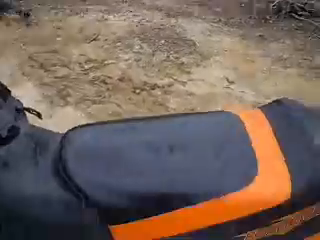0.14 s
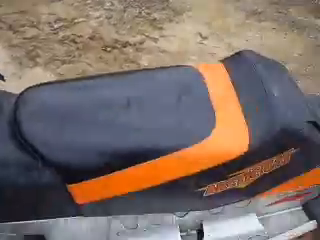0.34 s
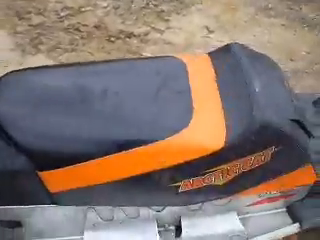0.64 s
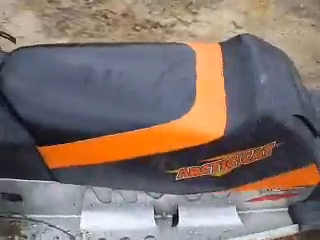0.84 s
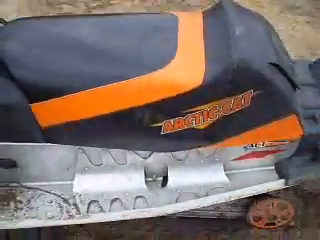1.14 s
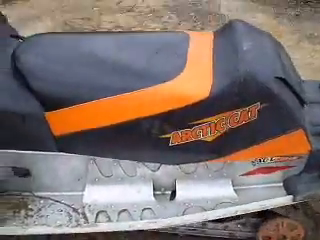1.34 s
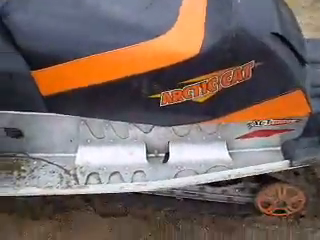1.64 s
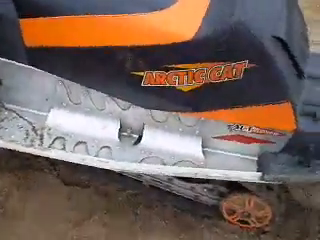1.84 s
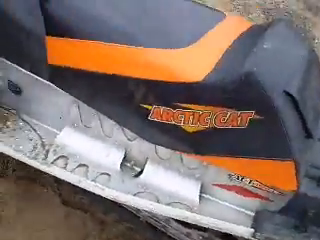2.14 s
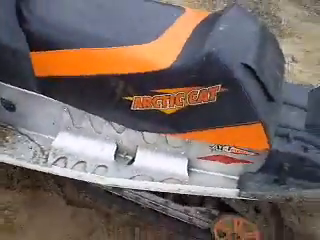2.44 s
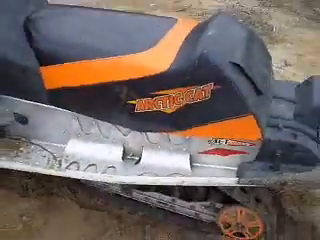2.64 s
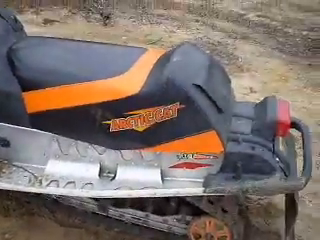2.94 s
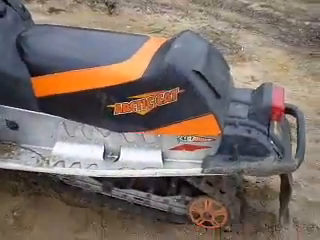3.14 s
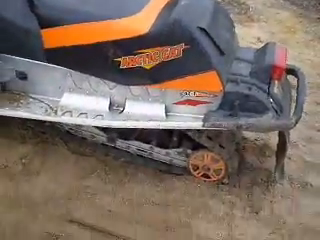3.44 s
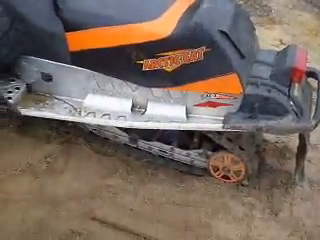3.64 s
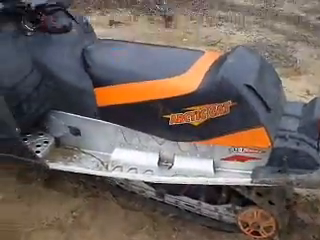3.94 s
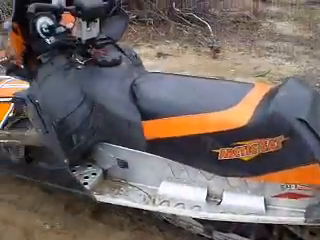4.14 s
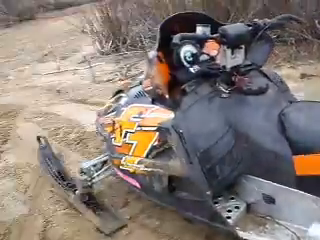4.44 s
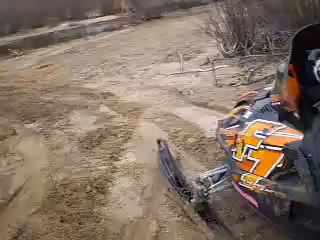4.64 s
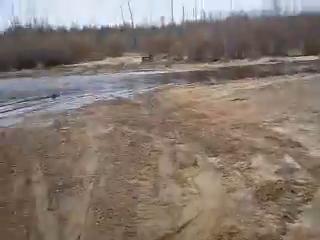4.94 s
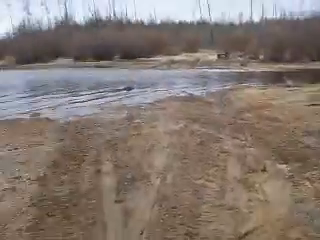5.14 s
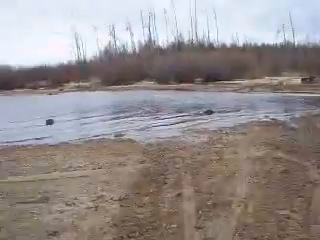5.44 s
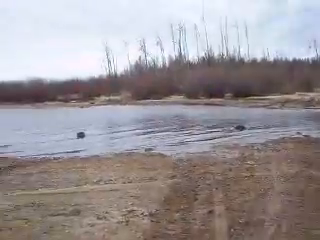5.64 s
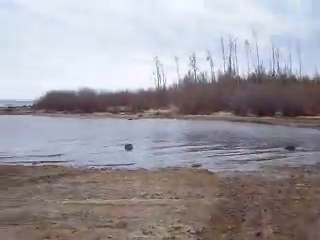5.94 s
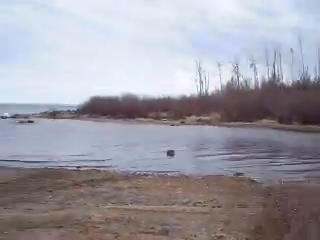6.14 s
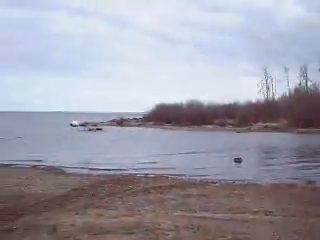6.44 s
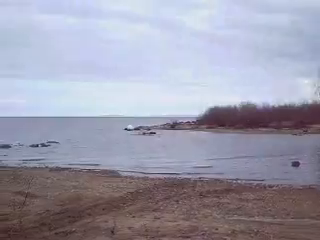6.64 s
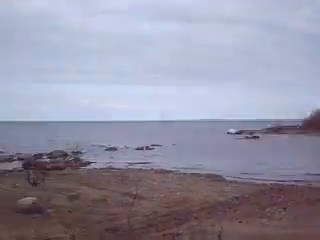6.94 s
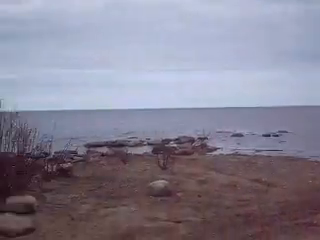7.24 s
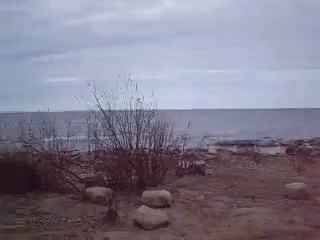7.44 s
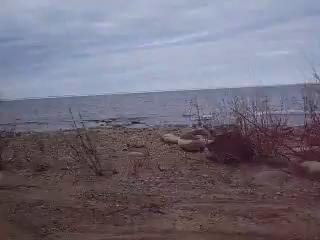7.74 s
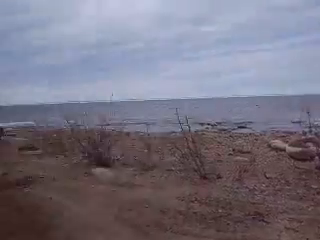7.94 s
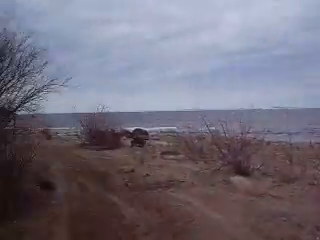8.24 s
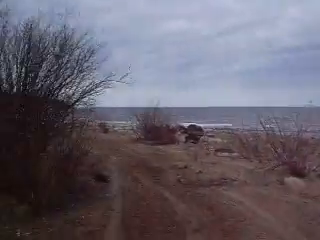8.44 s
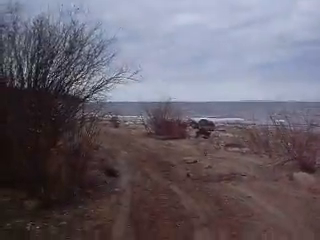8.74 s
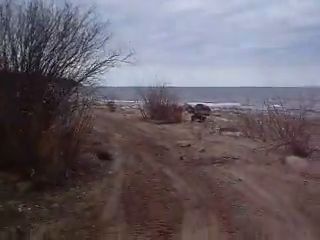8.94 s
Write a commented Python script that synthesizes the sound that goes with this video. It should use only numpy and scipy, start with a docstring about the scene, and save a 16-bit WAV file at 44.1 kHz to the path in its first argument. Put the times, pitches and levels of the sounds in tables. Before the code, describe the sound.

A two-stroke snowmobile is revved in eight short blips, stuttering and popping between them, then idles as wind buffets the microphone.

```python
"""A parked two-stroke snowmobile stutters and bangs as unburnt charge lights late and rings the pipe;
the drive whirrs, the engine clatters, wind gusts. From 0.3 s it is blipped eight times: on the throttle
every stroke fires and the pipe sings. From 1 s come scattered clanks, exhaust cracks and rattles.
After 6.2 s it idles, sagging from 7 s, as the listener walks away along a lake shore. Throughout,
a small camera overloads on the peaks and holds its samples coarsely, which adds a glassy fizz."""
import sys
import numpy as np
from scipy import signal
from scipy.fft import rfft, irfft, next_fast_len
from scipy.io import wavfile
from scipy.ndimage import uniform_filter1d

SR = 44100
rng = np.random.default_rng(int(sys.argv[2]) if len(sys.argv) > 2 else 0)


def transcribe(signal):
    """Save signal, clipped to [-1, 1], as a 16-bit WAV file at the path in sys.argv[1]."""
    frames = np.atleast_2d(signal).T
    limited = np.clip(frames, -1, 1)
    pcm = np.round(limited * 32767).astype(np.int16)
    wavfile.write(sys.argv[1], SR, pcm)


N = 399987
TIME = np.arange(N) / SR


def from_db(db):
    return 10 ** (np.asarray(db) / 20)


def rms_one(x):
    return x / np.sqrt(np.mean(x ** 2) + 1e-20)


def during(start, end):
    return (TIME >= start) & (TIME < end)


def curves(rows):
    """Columns of (t/s, ...) rows, interpolated per sample."""
    times, *columns = np.transpose(rows)
    return [np.interp(TIME, times, column) for column in columns]


def gain_at(spectrum, hz):
    """Gain of (f/Hz, level/dB) rows; 50 dB down an octave past either end."""
    f, db = np.transpose(spectrum)
    log_f = np.log(np.r_[f[0] / 2, f, f[-1] * 2])
    return from_db(np.interp(np.log(hz + 1e-3), log_f, np.r_[db[0] - 50, db, db[-1] - 50]))


def noise(spectrum):
    """Coloured noise, rms 1."""
    size = next_fast_len(N)
    gain = gain_at(spectrum, np.arange(size // 2 + 1) * SR / size)
    return rms_one(irfft(rfft(rng.standard_normal(size)) * gain, size)[:N])


def drift(rate_hz):
    """Slow random wander, rms 1."""
    hop, settle = 40, 2000
    r = np.exp(-2 * np.pi * hop * rate_hz / SR)
    slow = signal.lfilter([1], [1, -2 * r, r * r], rng.standard_normal(N // hop + settle + 2))[settle:]
    return np.interp(np.arange(N) / hop, np.arange(len(slow)), rms_one(slow))


def resonate(x, hz, width_hz):
    """Two-pole resonance, peak gain 1."""
    r = np.exp(-np.pi * width_hz / SR)
    poles = [1, -2 * r * np.cos(2 * np.pi * hz / SR), r * r]
    return signal.lfilter(np.array([1, 0, -1]) * (1 - r * r) / 2, poles, x + 1e-18)


def decay(clicks, tau_s):
    """Exponential tail on each click."""
    return signal.lfilter([1], [1, -np.exp(-1 / (tau_s * SR))], clicks + 1e-18)


def bursts(rows, tau_s):
    """Decaying envelope per (t/s, level/dB) row."""
    clicks = np.zeros(N)
    for t, db in rows:
        clicks[int(t * SR)] = from_db(db)
    return decay(clicks, tau_s)


# Full throttle: open t/s, shut t/s, target f/Hz, level/dB of orders 1-2, of 3, of 4, of extra rasp
BLIPS = [(0.279, 0.584, 158, -10.5, -22, -20, 0.5), (1.246, 1.625, 167, -9.5, -21, -28, 2),
         (2.938, 3.319, 162.3, -9.5, -26, -29.5, 3.5), (3.561, 3.845, 183.5, -10.5, -15.5, -17, 7),
         (4.17, 4.478, 166, -10.5, -19, -14, 5.5), (4.839, 5.153, 166.9, -12.5, -22, -19.5, 6.5),
         (5.422, 5.664, 169, -12, -17, -25.5, 3.5), (5.958, 6.211, 176, -12.5, -20, -23, 7)]


def full_throttle(catch_s=.04, cut_s=.008):
    """1 while every stroke fires, 0 between blips."""
    return sum(np.clip(np.minimum((TIME - opened) / catch_s, (shut - TIME) / cut_s + .5), 0, 1)
               for opened, shut, *_ in BLIPS)


def blip_levels():
    """The blips' level columns, held through each blip."""
    return curves([(t, *dbs) for opened, shut, _, *dbs in BLIPS for t in (opened, shut)])


# Throttle part open: start t/s, end t/s, target f/Hz
PART_THROTTLE = [(0, .144, 124.7), (2.087, 2.428, 127.5), (2.428, 2.935, 115.1), (3.28, 3.56, 108),
                 (3.81, 4.17, 105.7)]


def crank_speed(start_hz=136, idle_hz=97.5, sag_hz_per_s=4.26, flywheel_s=.181, fuel_s=.14):
    """Strokes per second: the throttle sets a target, fuel builds or fades, the flywheel lags."""
    starve_s = .033  # pull fades before firing stops
    target_hz = idle_hz - sag_hz_per_s * np.maximum(TIME - 7, 0)
    for start, end, hz in PART_THROTTLE:
        target_hz[during(start, end)] = hz
    for opened, shut, hz, *_ in BLIPS:
        target_hz[during(opened, shut - starve_s)] = hz
    target_hz = uniform_filter1d(target_hz, int(fuel_s * SR), mode="nearest")
    return start_hz + decay(target_hz - start_hz, flywheel_s) / (flywheel_s * SR)


# Pipe response on and off the throttle: f/Hz, level/dB
LOADED_PIPE = [(115, -5.5), (150, .8), (200, 3), (245, -2.5), (285, -7), (320, 2), (410, -2), (490, 2),
               (620, -4)]
COASTING_PIPE = [(180, 4.5), (240, 2.5), (290, -8.5), (350, -9), (385, -14), (455, -18.5), (490, -10.5),
                 (560, -14)]
# Coasting note as the listener moves: t/s, level/dB of orders 1-2, of 3-4
COASTING_LEVELS = [(0, -16.5, -3.5), (.6, -22, -10), (1.2, -18.5, -9.5), (1.7, -17, -16),
                   (2.3, -14.5, -6.5), (2.9, -12, -6), (4.1, -10, -6.5), (4.6, -17.5, -13.5),
                   (5.9, -18, -18.5), (7.1, -25, -21.5), (7.7, -23.5, -17), (9.07, -21.5, -16.5)]


def order_levels(crank_hz, throttle):
    """Orders 1-4 in dB, swelling and fading as they sweep the pipe's resonances."""
    def piped(response, order, db):
        return db + 20 * np.log10(gain_at(response, order * crank_hz))

    low, third, fourth, _ = blip_levels()
    loaded = [piped(LOADED_PIPE, k, db) for k, db in enumerate((low, low, third, fourth), 1)]
    low, high = curves(COASTING_LEVELS)
    coasting = [low - 12.5]  # order 1 all but vanishes
    coasting += [piped(COASTING_PIPE, k, db) for k, db in enumerate((low, high, high - 4.5), 2)]
    return [throttle * on + (1 - throttle) * off for on, off in zip(loaded, coasting)]


def exhaust_note(turns, order_dbs, waver_db=1.2, lag_rad=.61):
    """Orders 1-4; the pipe delays the higher ones more."""
    out = np.zeros(N)
    for k, db in enumerate(order_dbs, 1):
        amplitude = np.sqrt(2) * from_db(db + waver_db * drift(28.5))
        out += amplitude * np.cos(2 * np.pi * k * turns - lag_rad * (k - 1) ** 2)
    return out


# Stutter off full throttle: start t/s, end t/s, gap/strokes, level/dB
STUTTER = [(0, .29, 3, -9.5), (.735, 1.26, 9, -9), (1.984, 2.3, 7, -12), (2.33, 2.95, 5.6, -8),
           (3.322, 3.56, 3, -8.5), (3.87, 4.17, 3, -6.5), (4.747, 4.87, 3, -12), (5.297, 5.4, 8.5, -12),
           (5.72, 5.95, 12, -12), (6.343, 8.1, 24, -21), (8.12, 9.07, 8.5, -16)]


def late_firings(strokes, uneven_db=1.8, scatter=.06, shut_db=-13):
    """Unburnt charge gathers for several strokes, then bangs: one click each."""
    clicks = np.zeros(N)
    for start, end, gap, db in STUTTER:
        run = strokes[(strokes >= start * SR) & (strokes < end * SR)]
        timing, strength = rng.standard_normal((2, 32))
        gaps = np.maximum(np.round(gap * (1 + scatter * timing)), 2).astype(int)
        counts = np.cumsum(gaps) - gaps[0]
        fired = run[counts[counts < len(run)]]
        clicks[fired] = from_db(db + uneven_db * strength[:len(fired)])
    for _, shut, *_ in BLIPS:  # last firing as the throttle shuts
        clicks[strokes[np.argmin(abs(strokes - shut * SR))]] = from_db(shut_db)
    return clicks


def throb(bangs, depth=1.9):
    """A bang swells the note, which sinks over the next few strokes."""
    swell = decay(bangs, tau_s=.028)
    for _ in range(2):
        swell = uniform_filter1d(swell, SR // 160)
    return 1 + depth * (swell - uniform_filter1d(swell, SR // 10))


def burns(bangs, strokes, note_db, throttle, carry=.057, load_evens_db=25):
    """A click per stroke: bangs stir the next charges; strokes burn unevenly, less so under load."""
    afterfire = signal.lfilter([1], [1, -carry], bangs[strokes])
    spread = from_db(note_db - 6.5 - load_evens_db * throttle)
    clicks = np.zeros(N)
    clicks[strokes] = from_db(-2) * afterfire + spread[strokes] * rng.standard_normal(N)[:len(strokes)]
    return clicks


# Exhaust pipe modes: f/Hz, width/Hz, level/dB
PIPE_MODES = [(135, 91, -9), (139.7, 40, 8), (208.6, 59, 9), (237.4, 48, 7), (331.4, 28, -2.5),
              (473, 22.4, -10), (580, 41, -16)]


def pipe_ring(clicks, vary_db=1.5, silencer_hz=(100, 600)):
    """Firings ring the pipe's modes, each a little differently; the silencer rounds them off."""
    at, out = np.flatnonzero(clicks), np.zeros(N)
    for k, (hz, width_hz, db) in enumerate(PIPE_MODES):
        kicks = np.zeros(N)
        kicks[at] = clicks[at] * from_db(db + vary_db * rng.standard_normal(len(at)))
        out += (-1) ** k * resonate(kicks, hz, width_hz) * SR / (2 * np.pi * width_hz)
    return signal.sosfilt(signal.butter(3, silencer_hz, "band", fs=SR, output="sos"), out)


# Listener passes the hood and walks off: t/s, level/dB of rasp, of whirr, of clatter
WALK_LEVELS = [(0, -34, -25.5, -41), (.25, -29, -33.5, -43.5), (.9, -34.5, -30.5, -43),
               (2, -32, -37.5, -40.5), (2.5, -35.5, -40, -44.5), (3.95, -35.5, -35, -41),
               (4.45, -34.5, -27.5, -39), (6.2, -33.5, -27.5, -45), (6.76, -36, -43, -47),
               (8.2, -32.5, -41.5, -41), (9.07, -31.5, -36, -44)]


def noise_levels(crank_hz, throttle, cruise_hz=115, pipe_tuned_hz=150):
    """Rasp, whirr, clatter in dB: all grow with speed; load also shifts rasp and clatter."""
    rasp_db, whirr_db, clatter_db = curves(WALK_LEVELS)
    excess_hz = crank_hz - cruise_hz
    bite_db = blip_levels()[-1] + .26 * (crank_hz - pipe_tuned_hz)
    return (rasp_db + .1209 * excess_hz + throttle * bite_db,
            whirr_db + .0752 * excess_hz,
            clatter_db + .02 * excess_hz + throttle * 3)


def puffs(turns, depth, uneven_db):
    """Envelope, rms 1: gas and moving parts pulse on each stroke."""
    return rms_one(np.exp(depth * np.cos(2 * np.pi * turns)) * from_db(uneven_db * drift(64)))


# Exhaust gas noise: f/Hz, level/dB
RASP_SPECTRUM = [(300, 2), (520, -5.5), (680, -2.5), (950, -1), (1200, -4.5), (1600, -23), (2500, -20)]


def exhaust_rasp(turns, db, bangs, hiss_db=-36):
    """Gas puffs on each stroke and hisses after each bang."""
    flow = from_db(db) * puffs(turns, depth=.16, uneven_db=1.5)
    hiss = from_db(hiss_db) * decay(bangs, tau_s=.02)
    return (flow + hiss) * noise(RASP_SPECTRUM)


# Drive resonance: f/Hz, level/dB
DRIVE_SPECTRUM = [(900, -15.5), (1200, -3.5), (1400, 1.5), (1540, -3), (1700, -10.5), (2100, -51)]


def drive_whirr(turns, db):
    """The spinning drive: a noise band, barely pulsed."""
    return from_db(db) * puffs(turns, depth=.054, uneven_db=1.5) * noise(DRIVE_SPECTRUM)


# Mechanical noise: f/Hz, level/dB
CLATTER_SPECTRUM = [(1200, -14), (1800, 6), (2100, 5), (2600, 3.5), (3300, -1.5), (3900, -1)]


def engine_clatter(turns, db):
    """Moving parts clatter on each stroke."""
    return from_db(db) * puffs(turns, depth=.2, uneven_db=1.35) * noise(CLATTER_SPECTRUM)


# Wind rumble: f/Hz, level/dB
WIND_SPECTRUM = [(12, 0), (25, -12), (50, 3.5), (90, -1), (160, 11.5), (400, -1.5)]


def wind(db=-27.5, gust_db=2):
    """Gusts buffet the microphone."""
    return from_db(db + gust_db * drift(3)) * noise(WIND_SPECTRUM)


# Pipe response to the upper orders: f/Hz, level/dB
SNARL_SPECTRUM = [(430, 1), (490, 11.5), (580, 3.5), (700, -8.5), (790, -12), (900, -3.5), (970, -3),
                  (1080, -11.5), (1500, -20), (2200, -28), (3500, -60)]


def port_buzz(turns, crank_hz, spectrum=SNARL_SPECTRUM, waver_db=3.5, jitter_turns=.0028):
    """Sharply opening ports make orders 5-18, which sweep through the given resonances."""
    turns, out = turns + jitter_turns * drift(26), np.zeros(N)
    for k in range(5, 19):
        amplitude = gain_at(spectrum, k * crank_hz) * from_db(waver_db * drift(8.8))
        out += amplitude * np.cos(2 * np.pi * (k * turns + rng.random()))
    return out


# Hard contacts: t/s, level/dB
CLANKS = [(1.071, -17), (1.336, -1.5), (2.8815, -1), (5.993, -17), (8.525, -21)]
# Metal modes: f/Hz, width/Hz, level/dB
METAL_MODES = [(1560.8, 730, -8), (2050, 270, -2.5), (3045, 210, -2.5)]


def metal_clanks():
    """A short rough contact rings the metal's modes."""
    contact = bursts(CLANKS, tau_s=.0023) * rng.standard_normal(N)
    return sum(from_db(db) * resonate(contact, hz, width_hz) * np.sqrt(SR / (np.pi * width_hz))
               for hz, width_hz, db in METAL_MODES)


# Exhaust cracks: t/s, level/dB
CRACKS = [(1.245, -12.5), (1.586, -14.5), (1.652, -10.5), (1.675, -8.5), (1.722, -12), (1.747, -18.5),
          (1.825, -14), (1.868, -38), (1.98, -10), (5.952, -16.5), (8.525, -17), (8.998, -19)]
# Crack noise: f/Hz, level/dB
CRACK_SPECTRUM = [(350, 7), (900, -8.5), (1600, -20), (3800, -18.5)]


def exhaust_cracks():
    """Sharp noise bursts from the exhaust."""
    return bursts(CRACKS, tau_s=.0094) * noise(CRACK_SPECTRUM)


# Loose parts: t/s, level/dB, f/Hz, t60/s
RATTLES = [(1.344, -18, 1800, 0.31), (1.35, -23, 2880, 0.28), (1.54, -29, 2500, 0.86),
           (1.65, -32, 2580, 0.59), (1.812, -20.5, 1290, 0.083), (1.938, -11.5, 1450, 0.044),
           (1.95, -18.5, 1440, 0.089), (2.892, -23, 2300, 0.13), (8.407, -25, 2882, 0.029)]


def rattles(relative_width=.55):
    """Loose parts rattle and clink, each in one resonance, broader the shorter it rings."""
    out = np.zeros(N)
    for t, db, hz, t60 in RATTLES:
        at = int(t * SR)
        age_s = TIME[:min(SR // 4, N - at)]
        width_hz = relative_width * hz * np.clip(.02 / t60, .5, 2)
        ring = rng.standard_normal(len(age_s))
        for _ in range(2):
            ring = resonate(ring, hz, width_hz)
        out[at:at + len(age_s)] += rms_one(ring) * from_db(db - 60 * age_s / t60)
    return out


def scene():
    """Exhaust, mechanical noises and wind, mono."""
    crank_hz, throttle = crank_speed(), full_throttle()
    turns = np.cumsum(crank_hz) / SR
    strokes = np.flatnonzero(np.diff(np.floor(turns)))
    order_dbs = order_levels(crank_hz, throttle)
    rasp_db, whirr_db, clatter_db = noise_levels(crank_hz, throttle)
    bangs = late_firings(strokes)
    firings = burns(bangs, strokes, order_dbs[1], throttle)
    exhaust = from_db(-.26) * throb(bangs) * exhaust_note(turns, order_dbs) + pipe_ring(firings)
    # under load the rasp turns to a buzz and the whirr takes the engine's pitch
    load_db = 16 * (throttle - 1)
    snarl = from_db(rasp_db + load_db + 4.5) * port_buzz(turns, crank_hz)
    whine = from_db(whirr_db + load_db - 4) * port_buzz(turns, crank_hz, DRIVE_SPECTRUM)
    rasp = exhaust_rasp(turns, rasp_db + 2.5 - 5 * throttle, bangs)
    whirr = drive_whirr(turns, whirr_db + 1.1 - .47 * throttle)
    clatter = engine_clatter(turns, clatter_db + 4)
    engine = exhaust + snarl + whine + rasp + whirr + clatter + exhaust_cracks()
    return (engine + wind() + metal_clanks() + rattles())[None]


def record(dry, band_hz=3900, hold_hz=8000, cutoff_hz=12450):
    """Low-pass and clip; sample-and-hold mirrors the sound into the treble; the top is cut."""
    narrow = signal.sosfilt(signal.butter(6, band_hz, fs=SR, output="sos"), dry[0])
    held = np.interp(np.floor(TIME * hold_hz) / hold_hz, TIME, np.clip(narrow, -1, 1))
    return signal.sosfilt(signal.ellip(10, .2, 70, cutoff_hz, fs=SR, output="sos"), held)[None]


dry = scene()
out = record(dry)
transcribe(out)
```